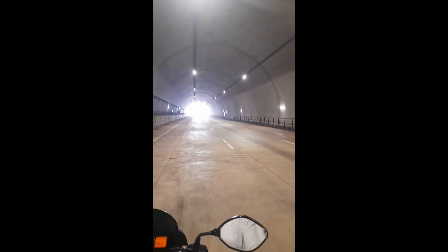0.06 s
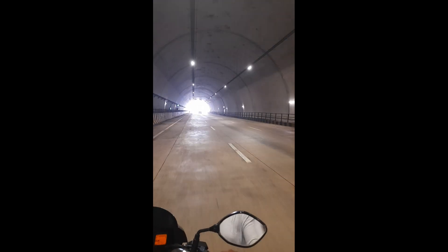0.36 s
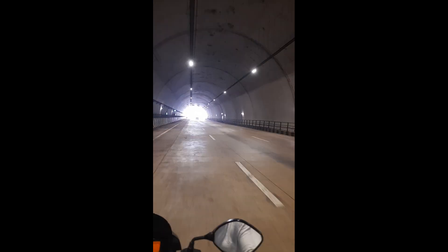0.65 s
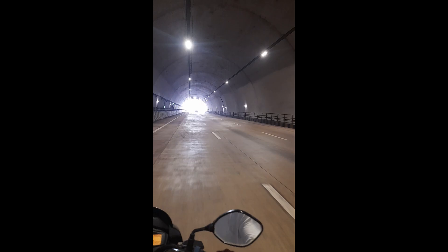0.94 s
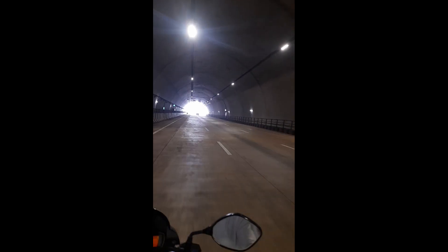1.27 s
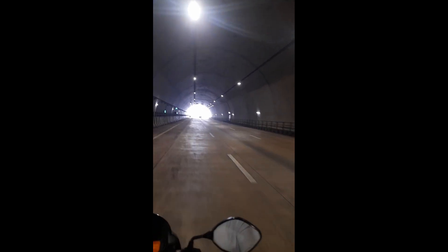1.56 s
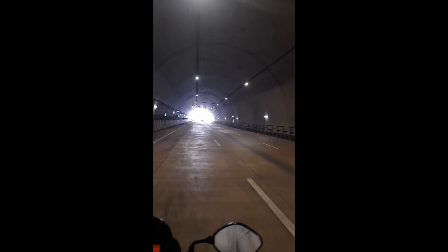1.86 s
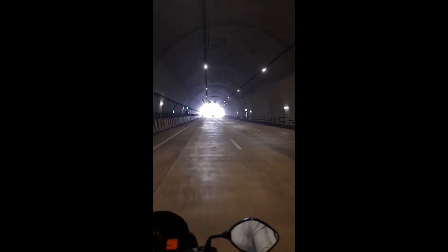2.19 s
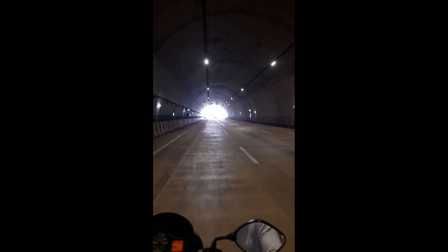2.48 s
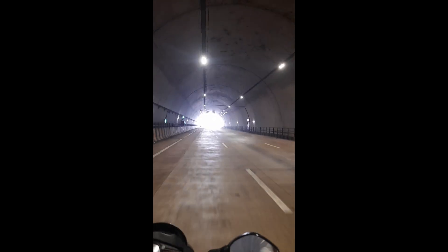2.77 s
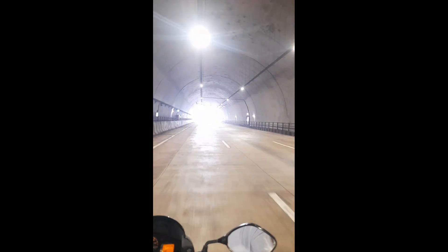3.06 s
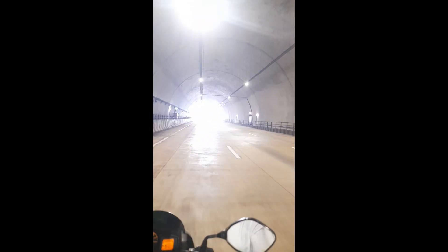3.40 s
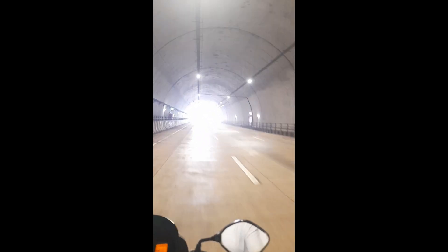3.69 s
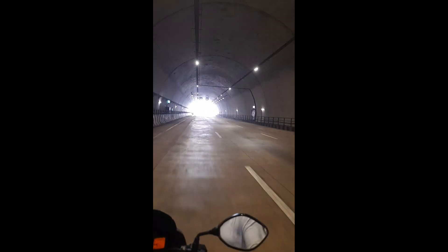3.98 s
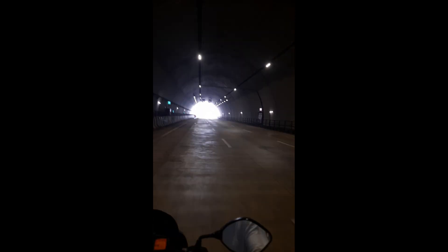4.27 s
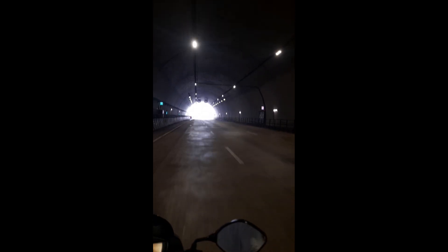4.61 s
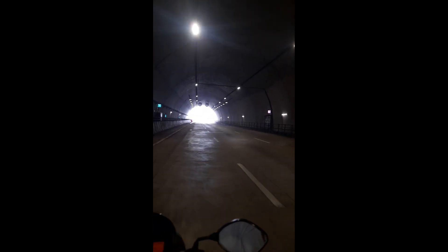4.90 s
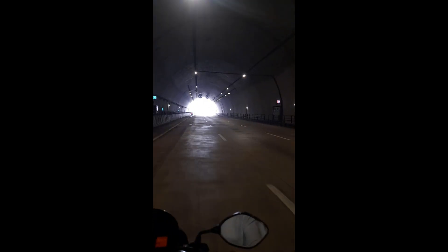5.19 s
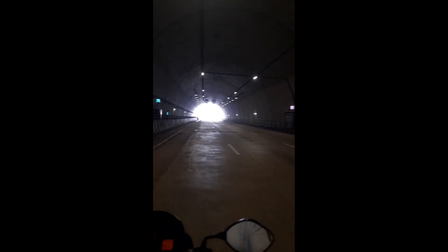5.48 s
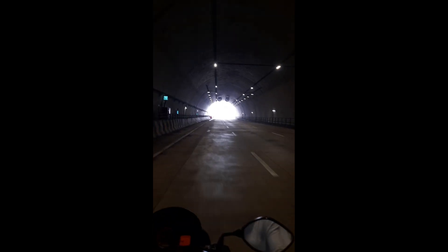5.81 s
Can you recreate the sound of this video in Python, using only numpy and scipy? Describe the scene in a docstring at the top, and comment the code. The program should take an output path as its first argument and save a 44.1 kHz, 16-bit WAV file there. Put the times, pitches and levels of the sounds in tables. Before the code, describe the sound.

A motorcycle cruises through a road tunnel with buffeting wind and roaring tyres, and a two-tone horn toots three times with echoes.

```python
"""Inside a concrete road tunnel, heard from the seat of a cruising motorcycle.
The engine throbs while wind beats on both sides of the microphone, with thumps, lulls and
hissing gusts. Tyre noise roars off the walls and a thin whine climbs.
A two-tone horn, buzzing with two thin metal discs, toots three times, and the wall echoes
smear the toots into fluttering tails."""
import sys
import numpy as np
from scipy import signal
from scipy.fft import rfft, irfft, next_fast_len
from scipy.io import wavfile
from scipy.ndimage import uniform_filter1d, map_coordinates

SR = 44100
rng = np.random.default_rng(int(sys.argv[2]) if len(sys.argv) > 2 else 0)


def pcm_store(signal):
    """Save signal as 16-bit PCM."""
    levels = np.round(np.clip(np.atleast_2d(signal), -1, 1) * 32767)
    wavfile.write(sys.argv[1], SR, levels.astype(np.int16).T)


N = 266805

# How loud the tyres are. Each row: time in seconds, level in dB.
TYRE_LEVELS = [(0, -30), (.6, -29), (.88, -27.5), (1.1, -30), (1.6, -32), (2.1, -32), (2.45, -30.5),
               (2.95, -30.5), (3.08, -29), (3.24, -30.5), (3.36, -30), (3.8, -30), (4.6, -31.5),
               (4.78, -31), (5.05, -30.5), (5.2, -29.5), (5.7, -28), (6.05, -28)]
# The tone of the tyre noise. Each row: frequency in Hz, level in dB.
TYRE_COLOUR = [(300, 3), (650, 0), (1000, -2.5), (1250, -0.5), (1600, -0.5), (1950, -3.5), (2500, -4.5),
               (3000, -7.5), (3500, -14.5), (5000, -31.5), (8000, -67)]
# Big swirls of air, one thump each. Each row: time in seconds, half length in seconds,
# pitch in Hz, level in dB.
EDDIES = [(0.098, 0.0096, 134.3, -17), (0.562, 0.016, 125, -19), (0.677, 0.0089, 153.3, -14),
          (0.771, 0.0062, 125.7, -13), (.88, 0.014, 72, -20), (1.074, 0.0098, 144.5, -17),
          (1.822, .011, 153.9, -16), (2.081, 0.0064, 138.7, -16), (2.275, .01, 151.6, -14),
          (2.436, 0.013, 150, -20), (2.577, 0.0067, 151.8, -15.5), (2.664, .012, 144, -18.5),
          (2.794, 0.0073, 140, -17), (2.897, 0.027, 146, -23.5), (3.067, .023, 150.7, -21),
          (3.167, 0.0086, 127.6, -20), (3.326, 0.027, 154.8, -17.5), (3.388, 0.0075, 130, -15),
          (3.521, 0.0075, 145, -10.5), (3.645, 0.0096, 126.7, -18), (3.71, .02, 62.4, -21),
          (3.81, .012, 126.3, -13), (3.935, .009, 95, -16.5), (3.987, 0.019, 112, -17.5),
          (4.283, 0.021, 66, -16.5), (4.51, 0.009, 150, -14), (4.64, 0.007, 128.8, -12.5),
          (4.681, .005, 120, -15), (5.054, 0.017, 151, -19.5), (5.234, 0.013, 68.3, -19)]
# Gusts over the bike. Each row: time in seconds, half length in seconds, hiss in dB, fizz in dB.
GUSTS = [(0.664, 0.072, -43.5, -59), (0.881, 0.049, -34, -50), (1.023, 0.066, -35.5, -51.5),
         (1.153, 0.069, -35, -48.5), (1.35, 0.22, -41, -68), (3.12, 0.075, -43, -70),
         (5.248, 0.026, -41, -70), (5.594, 0.095, -38, -62), (5.843, 0.06, -37.5, -54),
         (6.027, 0.089, -39, -68)]


def amp(db):
    """Turn decibels into a gain to multiply by."""
    return 10 ** (np.asarray(db) / 20)


def unit(x):
    """Scale a signal so that its average power is 1."""
    return x / np.sqrt(np.mean(np.abs(x) ** 2) + 1e-20)


def along(points, hz):
    """Read between rows of frequency and value, on a scale of musical pitch."""
    frequencies, values = np.transpose(points)
    return np.interp(np.log(hz + 1), np.log(frequencies + 1), values)


def curves(rows):
    """Draw each column after the time as a curve with one value per sample."""
    times, *columns = np.transpose(rows)
    return [np.interp(np.arange(N) / SR, times, column) for column in columns]


def swell(at, half_length):
    """A bell-shaped rise and fall around a moment, both given in seconds."""
    return np.exp(-.5 * ((np.arange(N) / SR - at) / half_length) ** 2)


def held(rows, attack, release, lead=0):
    """For each row, fade in, hold a drifting level and fade out, all lead seconds early."""
    t = np.arange(N) / SR + lead
    gain = np.zeros(N)
    for start, end, db, db_per_s in rows:
        gate = np.clip((t - start) / attack, 0, 1) * np.clip((end - t) / release, 0, 1)
        gain += amp(db + db_per_s * np.clip(t - start, 0, end - start)) * gate
    return gain


def lagged(x, seconds):
    """Follow a signal sluggishly: more seconds make it slower."""
    keep = np.exp(-1 / (seconds * SR + 1))
    return signal.lfilter([1 - keep], [1, -keep], x)


def wobble(rate):
    """A smooth curve through random points, rate of them each second."""
    coarse = np.linspace(0, N, 2048)
    smooth = map_coordinates(rng.standard_normal(2048), [coarse * rate / SR], mode="wrap")
    return np.interp(np.arange(N), coarse, smooth)


def flutter(rate, depth_db):
    """A quick random gain, limited so that no single puff stands out."""
    return unit(amp(depth_db * np.tanh(wobble(rate))))


def wall_echoes(rate):
    """Many echoes shift as the bike moves, changing a tone's strength and timing at random."""
    return unit(wobble(rate) + 1j * wobble(rate))


def phasor(hz):
    """A point that circles at the given pitch; its real part is a pure tone."""
    return np.exp(2j * np.pi * np.cumsum(hz) / SR)


def filtered(x, response):
    """Scale each frequency in a signal by the gain that response gives it."""
    size = next_fast_len(N + SR // 2)
    return irfft(rfft(x, size) * response(np.fft.rfftfreq(size, 1 / SR)), size)[..., :N]


def panned(balance_db):
    """Left and right gains; a positive balance leans left."""
    return amp(np.array([balance_db, -balance_db]).reshape(2, -1) / 2)


def rush(colour):
    """Stereo noise of a given tone: the sides are alike in the bass, unrelated in the treble."""
    # Each row: frequency in Hz, how alike left and right are from 0 to 1.
    likeness = [(60, 0.85), (130, 0.64), (290, 0.55), (630, 0.31), (1400, 0), (15000, 0.019)]

    def response(hz):
        angle = np.arccos(np.clip(along(likeness, hz), -1, 1)) / 2
        return amp(along(colour, hz)) * [np.cos(angle), np.sin(angle)]

    mid, side = filtered(rng.standard_normal((2, N)), response)
    return np.array([mid + side, mid - side]) / np.std(mid)


def patchy(x, depth_db):
    """Let patches of low and high pitch in a noise surge and sink on their own."""
    bands = signal.stft(x, nperseg=512)[2]
    patches = uniform_filter1d(rng.standard_normal(bands.shape[1:]), size=5, axis=0)  # across pitch
    patches = uniform_filter1d(patches, size=9, axis=1)  # across time
    gain = unit(amp(depth_db * np.tanh(unit(patches))))
    return signal.istft(bands * gain, nperseg=512)[1][:, :N]


def lull_db():
    """The change in level as the wind drops for brief moments."""
    # Each row: time in seconds, depth in dB.
    lulls = [(1.11, 1.5), (1.3, 2.5), (1.6, 2.5), (2.61, 0), (2.73, 5), (3.0, 6), (3.24, 7), (3.47, 6),
             (3.785, -0.5), (4.59, 3.5), (4.71, 3), (4.86, 8), (5.12, 3)]
    return -sum(depth * swell(at, half_length=0.013) for at, depth in lulls)


def eddy_pressure():
    """How hard the big swirls of air push at each moment."""
    return sum(amp(db) * swell(at, half) for at, half, _, db in EDDIES)


def whistle(track, half_width_hz):
    """A narrow band of noise that follows a pitch and a level."""
    hz, level = curves(track)
    real, imag = filtered(rng.standard_normal((2, 2, N)), lambda f: 1 / (1 + (f / half_width_hz) ** 4))
    return amp(level) * np.sqrt(2) * np.real(phasor(hz) * unit(real + 1j * imag))


def thin_whine():
    """A faint, high whine that slowly climbs."""
    # Each row: time in seconds, pitch in Hz, level in dB.
    track = [(0, 8280, -57), (1.6, 8270, -61.5), (2.5, 8340, -60.5), (3.3, 8460, -59), (4, 8690, -55.5),
             (4.6, 8970, -56), (5.3, 9030, -57.2), (6.05, 9020, -52)]
    return whistle(track, half_width_hz=200)


def edge_whistle():
    """Wind whistles briefly on an edge of the bike."""
    # Each row: time in seconds, pitch in Hz, level in dB.
    track = [(0, 4400, -70), (.8, 4400, -56), (1.02, 4400, -37), (1.25, 4380, -57), (1.55, 4350, -45),
             (1.8, 4350, -61), (6.05, 4350, -72)]
    return whistle(track, half_width_hz=290)


def road_pings(count_per_pitch=26, ring_s=0.077, rise_s=0.0025, scatter=0.052, spread_db=3.5):
    """Faint rings in the road noise at random moments, each a little off pitch and to one side."""
    # Each row: pitch in Hz, level in dB.
    pings = [(1300, -37), (1600, -38), (2550, -36)]
    t = np.arange(SR // 5) / SR
    out = np.zeros((2, N + len(t)))
    shape = amp(-60 * t / ring_s) * (1 - np.exp(-t / rise_s))
    for hz, db in pings:
        starts = rng.integers(N, size=count_per_pitch)
        for at, (detune, size, side) in zip(starts, rng.standard_normal((count_per_pitch, 3))):
            ring = shape * np.sin(2 * np.pi * hz * (1 + scatter * detune) * t)
            out[:, at:at + len(t)] += amp(db + spread_db * size) * ring * panned(spread_db * side)
    return out[:, :N]


def air_fizz(steady_db=-32.0):
    """Air tears away from the bike with a very bright hiss, most of all in a strong gust."""
    # Each row: frequency in Hz, level in dB.
    colour = [(6000, -24), (9000, -11), (11500, -2.5), (14000, -14), (15000, -20)]
    steady = amp(curves(TYRE_LEVELS)[0] + steady_db)
    gusts = sum(amp(db) * swell(at, half) for at, half, _, db in GUSTS)
    return np.hypot(steady, gusts) * rush(colour)


def air_hiss(steady_db=-13.5):
    """Passing air hisses, rising with the tyre noise and swelling in each gust."""
    # Each row: frequency in Hz, level in dB.
    colour = [(1000, -43), (2500, 1), (3600, -1), (4300, 4), (4900, 1), (5700, 3), (6500, -2), (7200, -9.5),
              (8000, -21.5), (9700, -18), (11200, -13), (13000, -14.5), (15000, -19.5)]
    steady = amp(curves(TYRE_LEVELS)[0] + steady_db)
    power = steady ** 2 + sum((amp(db) * swell(at, half)) ** 2 for at, half, db, _ in GUSTS)
    return np.sqrt(power) * flutter(rate=70, depth_db=2.24) * rush(colour) * panned(-0.7)


def tunnel_roar(roar_db=1.9, eddy_db=-8.5, lull_share=0.79):
    """The tunnel traps the sound of tyres and passing air as a low, broad roar."""
    # Each row: time in seconds, level in dB.
    levels = [(0, -28.5), (.5, -28.5), (1.3, -23.5), (1.9, -26.5), (2.55, -24.5), (3.1, -23), (3.9, -25),
              (4.8, -24.5), (5.6, -23.5), (6.05, -23)]
    # Each row: frequency in Hz, level in dB.
    colour = [(80, -1), (180, -7), (250, -2.5), (320, -1), (420, -5), (560, -9.5), (800, -15), (1500, -24),
              (4000, -61)]
    steady = amp(curves(levels)[0] + roar_db + lull_share * lull_db())
    strength = np.hypot(steady, amp(eddy_db) * eddy_pressure())
    return strength * flutter(rate=60, depth_db=3.0) * rush(colour) * panned(-2.0)


def tyres(tyre_db=0.83, lull_share=0.35):
    """Tyres roll over concrete with a grainy rush."""
    strength = amp(curves(TYRE_LEVELS)[0] + tyre_db + lull_share * lull_db())
    grain = flutter(rate=110, depth_db=1.87)
    return strength * grain * patchy(rush(TYRE_COLOUR), depth_db=3.0) * panned(-1.1)


def crosswind(lumpy_db=1.0, left_db=-22, high_cut_hz=1300):
    """Air from the side roars on the right of the microphone until the bike is sheltered."""
    # Each row: start in seconds, end in seconds, level in dB, swell in dB per second.
    blasts = [(-.02, 0.72, -14.5, -4.5), (.68, 0.93, -14, 1)]
    # Each row: frequency in Hz, level in dB.
    colour = [(30, -30), (50, -9), (85, -0.5), (140, -5), (200, -12), (300, -1.5), (420, -11), (700, -17.5),
              (1300, -22.5), (3000, -60)]
    strength = held(blasts, attack=0.029, release=0.052) * unit(amp(lumpy_db * wobble(40.9)))
    noise = rng.standard_normal(N)
    roar = filtered(noise, lambda hz: amp(along(colour, hz)) / (1 + (hz / high_cut_hz) ** 4))
    return strength * unit(roar) * amp([[left_db], [0]])


def headwind(buffet_db=-2.5, eddy_db=-8.0):
    """Wind from ahead beats on both sides of the microphone, and big swirls thump through it."""
    # Each row: time in seconds, level in dB.
    levels = [(0, -21), (.8, -21.5), (1.25, -27), (1.55, -24), (2.0, -25.5), (2.5, -23), (3.0, -20.5),
              (3.44, -25), (3.68, -21), (4.0, -18), (4.4, -20.5), (4.88, -21), (5.1, -23), (5.45, -18),
              (5.8, -21.5), (6.05, -21)]
    # Each row: frequency in Hz, level in dB.
    colour = [(15, -43), (30, -37), (42, -29), (60, 0.5), (80, 1.5), (110, -3.5), (152, -0.5), (190, -6.5),
              (300, -16.5), (600, -20.5), (1500, -66)]
    buffet = amp(curves(levels)[0] + buffet_db + lull_db()) * flutter(rate=27, depth_db=4.6)
    return np.hypot(buffet, amp(eddy_db) * eddy_pressure()) * rush(colour) * panned(1.7)


def eddy_booms(waver=0.045):
    """Each big swirl of air booms for a few cycles at its own pitch, alike on both sides."""
    wavering_time = np.cumsum(1 + waver * wobble(50)) / SR
    out = np.zeros(N)
    for at, half, hz, db in EDDIES:
        tone = np.sin(2 * np.pi * (hz * wavering_time + rng.random()))
        out += amp(db) * swell(at, half) * tone
    return np.sqrt(2) * out


def engine(firing_hz=24.9, waver=0.0041, echo_share=0.55, drone_db=-1.5, clatter_db=-43):
    """The engine hums three low drones, roughened by wall echoes, and clatters at each firing."""
    # The pitch of each drone in Hz.
    pitches = [99.6, 124.2, 154.0]
    # The drones swell and sink along the tunnel. Each row: time in seconds, then the levels
    # of the lowest, middle and highest drone in dB.
    levels = [(0, -32, -39, -45), (.25, -24, -36, -43), (.55, -40, -36, -26), (1.05, -25, -26, -40),
              (1.45, -34, -35, -35), (1.75, -38, -30, -28), (2.05, -24, -33, -27.5),
              (2.35, -30, -28.5, -26), (2.75, -39, -31, -39), (3.2, -31, -43, -45), (3.44, -36, -39, -37),
              (3.6, -20.5, -22, -22.5), (3.98, -30, -26.5, -36), (4.2, -23.5, -29, -25),
              (4.6, -26, -27.5, -25), (4.88, -27, -36, -32), (5.15, -26, -27.5, -33), (5.4, -24, -22, -25),
              (5.65, -25, -30.5, -29), (6.05, -33, -21.5, -28)]
    speed = 1 + waver * wobble(3.04)
    drone = np.zeros(N)
    for hz, db in zip(pitches, curves(levels)):
        drone += amp(db) * np.real(phasor(hz * speed) * (1 + echo_share * wall_echoes(24)))
    firing = unit(((1 + phasor(firing_hz * speed).real) / 2) ** 2)
    clatter = amp(clatter_db) * firing * rush(TYRE_COLOUR)
    return np.sqrt(2) * drone * amp(drone_db + lull_db()) + clatter


def interference_db(hz, within_hz=60):
    """As the bike moves, wall echoes briefly cancel or strengthen single overtones of the horn."""
    # Each row: time in seconds, half length in seconds, pitch in Hz, change in dB.
    changes = [(3.922, 0.053, 521, -14), (3.915, 0.016, 1042, 3.5), (3.975, .012, 1042, -9),
               (4.11, .022, 1042, -8), (4.202, 0.031, 1042, 9), (5.235, 0.029, 1042, 5),
               (5.385, 0.03, 1042, 14), (5.465, 0.027, 1042, -8), (5.71, .04, 1042, -5),
               (3.917, .012, 1265, -5), (4.003, 0.022, 1265, -2), (5.3, .012, 1265, -10),
               (5.35, .022, 1265, 6), (5.40, .014, 1265, -5), (5.55, 0.023, 1265, 4.5),
               (5.763, .018, 1265, -4), (5.96, 0.11, 1265, 1.5), (3.93, .016, 1687, 3.5),
               (5.52, 0.021, 1687, 3), (5.594, 0.012, 1687, -9), (5.85, 0.031, 1687, -10),
               (5.99, 0.034, 1687, 7.5), (5.51, 0.043, 2109, 5), (5.69, .018, 2109, -8),
               (5.84, .035, 2109, 3), (6.02, .04, 2109, -10), (4.006, 0.019, 2531, -9),
               (5.588, 0.046, 2531, -12), (5.728, 0.043, 2531, 3), (3.95, 0.027, 2953, 6),
               (5.52, 0.089, 2953, -14), (5.72, 0.037, 2953, -3.5)]
    return sum(db * swell(at, half) for at, half, pitch, db in changes if abs(hz - pitch) < within_hz)


def horn(pitch_hz, overtones, lead_s, direct_db, tail_db, bass_ring_s, flutter_rate):
    """A metal disc buzzes; each overtone builds up in the tunnel, echoes once and flutters away."""
    # Presses of the button. Each row: start in seconds, end in seconds, level in dB,
    # swell in dB per second, brightness in dB per octave.
    toots = [(3.861, 4.032, -1.1, 0, -3.5), (5.221, 5.32, -4, 2, -2), (5.442, 6.1, -1.96, -2, 0.5)]
    echo_s, held_tail_share = 0.29, 0.38
    pivot_hz, half_ring_hz = 1300, 3000
    cycle = phasor(np.full(N, pitch_hz))
    out = np.zeros((2, N))
    for multiple, db, build_s, echo_db, spread in overtones:
        hz = multiple * pitch_hz
        octaves = np.log2(hz / pivot_hz)
        presses = [(start, end, level + bright * octaves, slope)
                   for start, end, level, slope, bright in toots]
        press = held(presses, attack=0.0035, release=0.013, lead=lead_s)
        echo = np.pad(press, (round(echo_s * SR), 0))[:N]
        body = lagged(np.hypot(amp(direct_db) * press, amp(echo_db) * echo), build_s)
        ring_s = bass_ring_s / (1 + hz / half_ring_hz)  # time to fade by 60 dB
        tail = amp(tail_db) * np.sqrt(np.abs(lagged(press ** 2, ring_s / np.log(1e6))))
        sounding = np.clip(lagged(1.0 * (press + echo > 0), build_s), 0, 1)
        tail *= 1 - (1 - held_tail_share) * sounding  # weaker while a toot or its echo sounds
        start_phase = np.exp(2j * np.pi * rng.random())
        tone = amp(db + interference_db(hz)) * cycle ** round(multiple) * start_phase
        sides = np.exp(.5j * spread * np.array([[1], [-1]]))
        walls = np.array([wall_echoes(flutter_rate), wall_echoes(flutter_rate)])
        out += np.real(tone * (body * sides + tail * walls))
    return np.sqrt(2) * out


def two_tone_horn():
    """One button sounds a low and a high horn, the high one a moment earlier."""
    # Each row in both tables: multiple of the pitch, level in dB, build-up time in seconds,
    # echo level in dB, how far left and right are out of step in radians.
    low_overtones = [(2, -36, 0.014, -2, 1.2), (3, -22.5, 0.096, -33, 1.5), (4, -24.5, .022, -4, 1.7),
                     (5, -31, .025, -6, 2.07), (6, -30, 0.024, -16, 1.2), (7, -32.5, 0.028, -9, .7),
                     (8, -39.5, 0.017, -11, 1), (9, -49, .02, -17, 1.5), (13, -45, .012, -16, 1.5),
                     (14, -54, .02, -15, 1.5)]
    high_overtones = [(1, -27, 0.044, -14, 0.87), (2, -30.8, .0048, -7, 1.32), (5, -43, .04, -10.5, 1.3),
                      (6, -43, .03, -10, 1.5)]
    low = horn(pitch_hz=421.8, overtones=low_overtones, lead_s=0,
               direct_db=-0.5, tail_db=-3.0, bass_ring_s=1.8, flutter_rate=36)
    high = horn(pitch_hz=521.0, overtones=high_overtones, lead_s=0.029,
                direct_db=0.0, tail_db=3.0, bass_ring_s=0.77, flutter_rate=39)
    return low * panned(-2.7) + high * panned(-1.0)


def scene():
    """The ride: horn, whine and engine together with the wind and the road."""
    tones = two_tone_horn() + thin_whine() + engine()
    wind = headwind() + eddy_booms() + crosswind() + air_hiss() + air_fizz()
    road = tunnel_roar() + tyres() + road_pings()
    return tones + wind + road + edge_whistle()


def record(dry, low_cut_hz=46, top_hz=15200):
    """Soften the deepest rumble and remove the very highest treble."""
    return filtered(dry, lambda hz: (hz < top_hz) * hz ** 3 / np.hypot(hz ** 3, low_cut_hz ** 3))


dry = scene()
out = record(dry)
pcm_store(out)
```